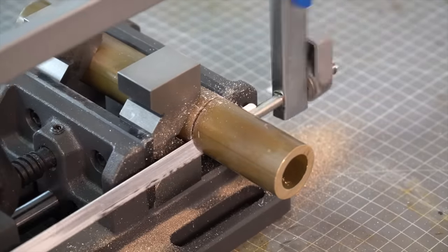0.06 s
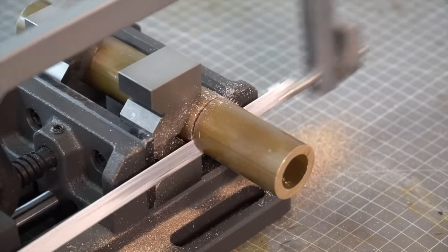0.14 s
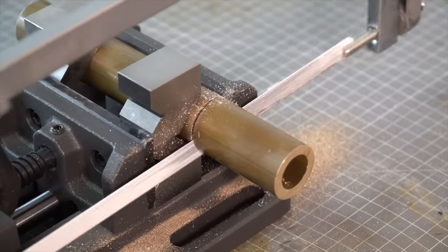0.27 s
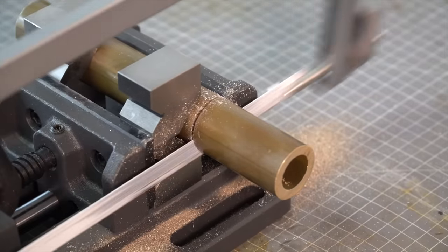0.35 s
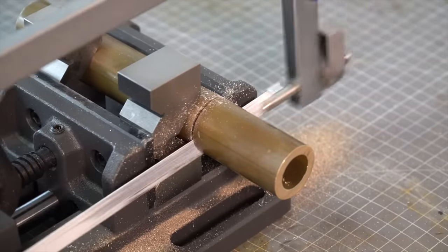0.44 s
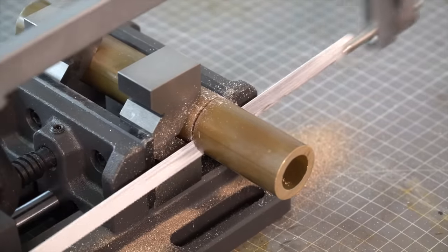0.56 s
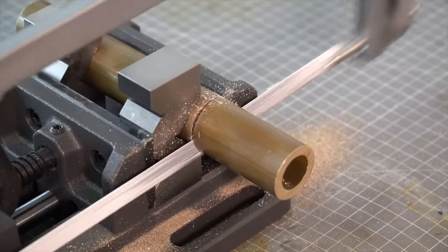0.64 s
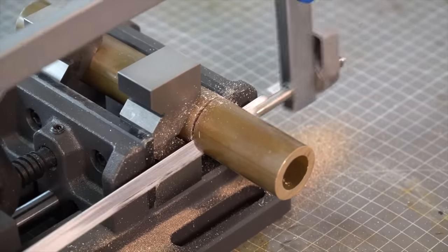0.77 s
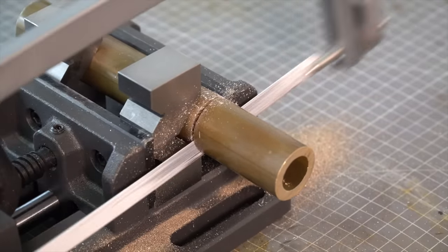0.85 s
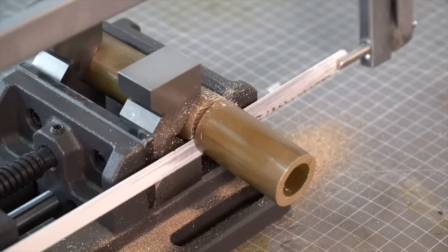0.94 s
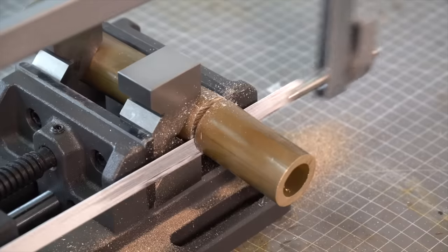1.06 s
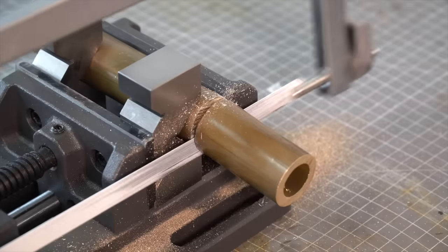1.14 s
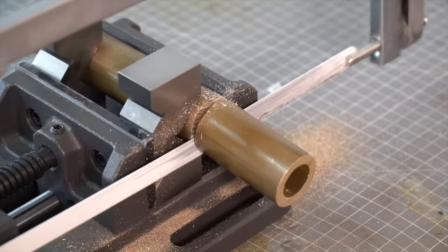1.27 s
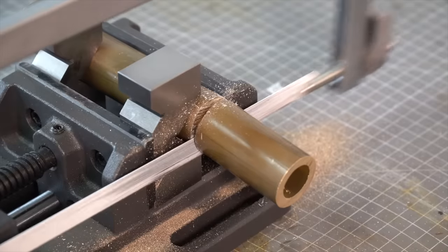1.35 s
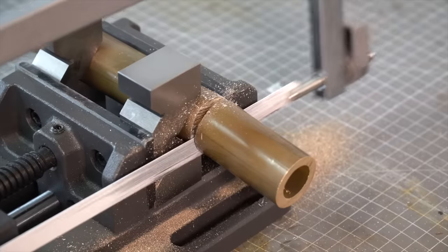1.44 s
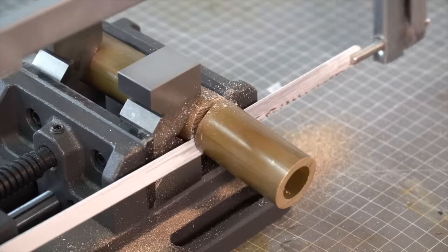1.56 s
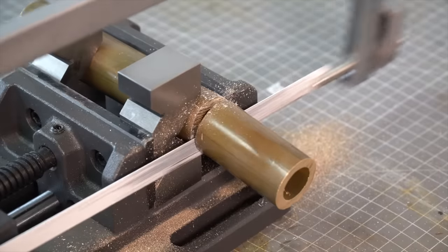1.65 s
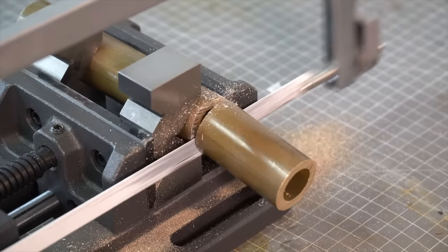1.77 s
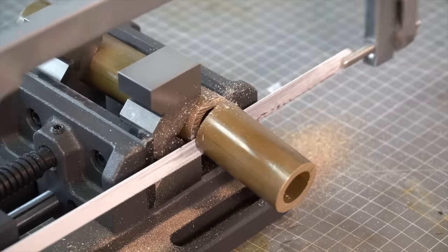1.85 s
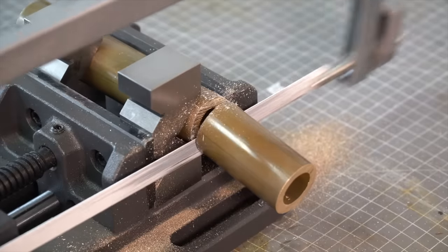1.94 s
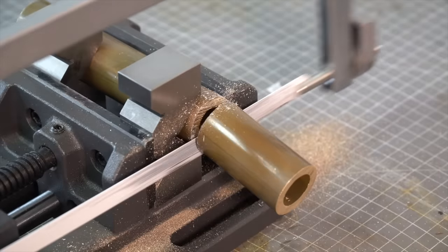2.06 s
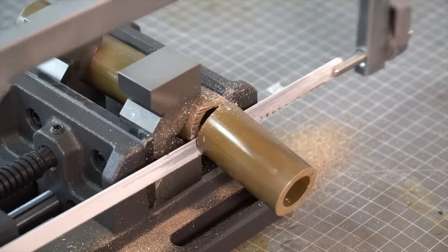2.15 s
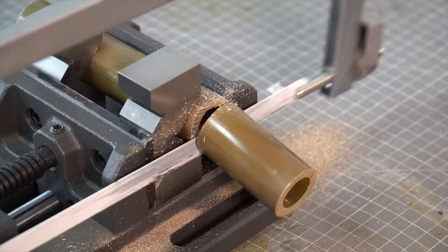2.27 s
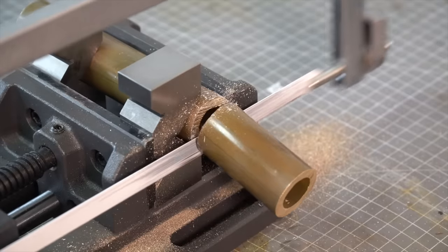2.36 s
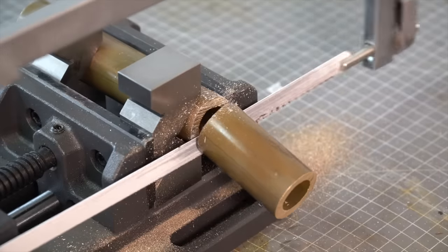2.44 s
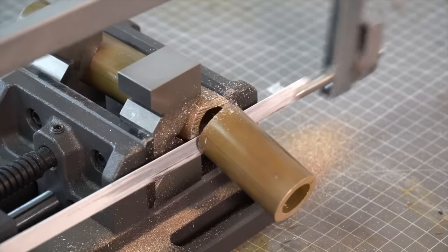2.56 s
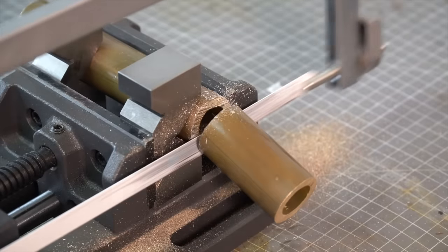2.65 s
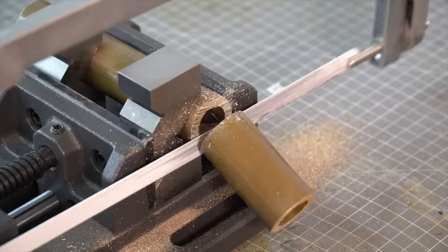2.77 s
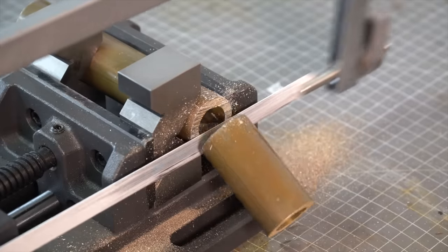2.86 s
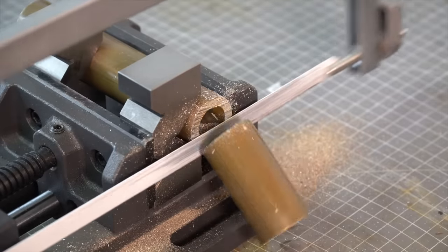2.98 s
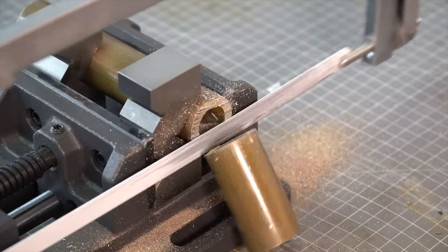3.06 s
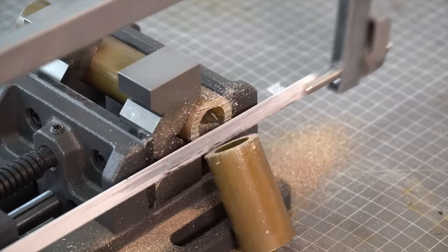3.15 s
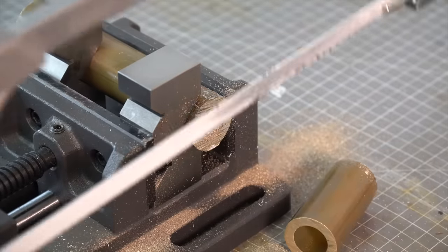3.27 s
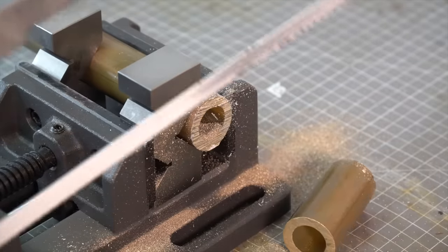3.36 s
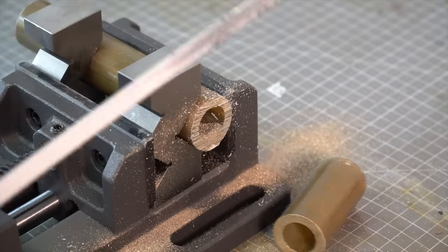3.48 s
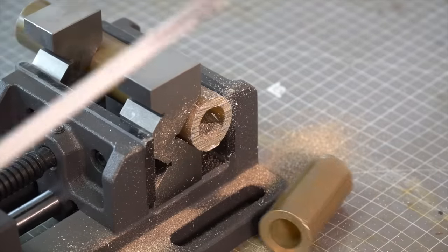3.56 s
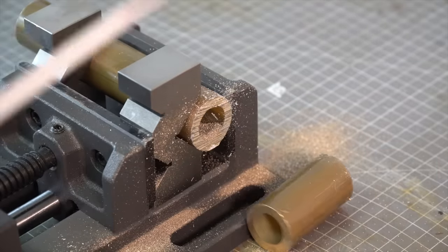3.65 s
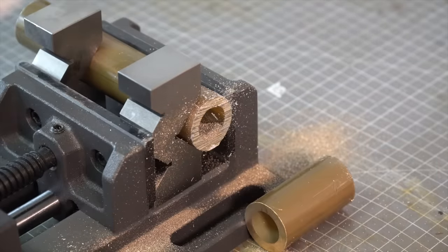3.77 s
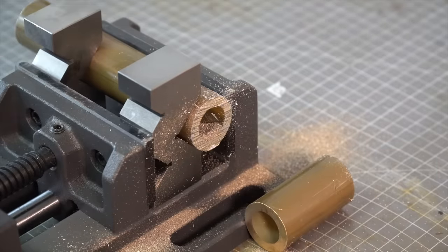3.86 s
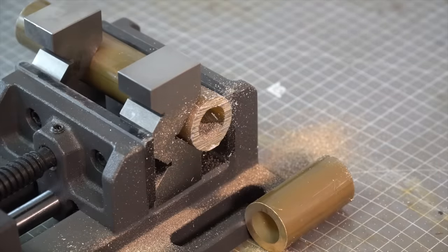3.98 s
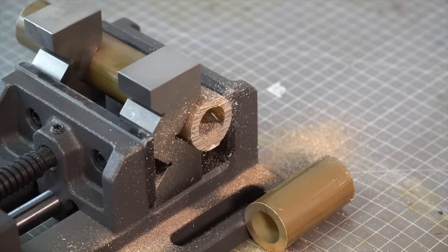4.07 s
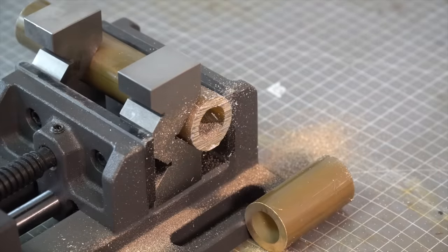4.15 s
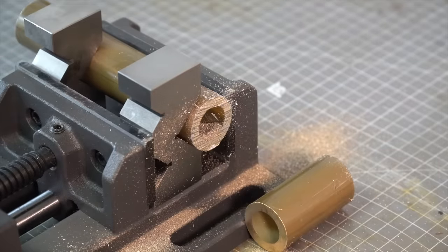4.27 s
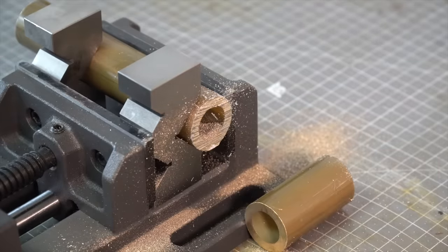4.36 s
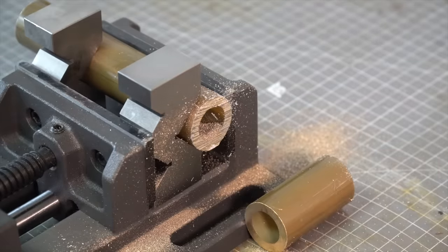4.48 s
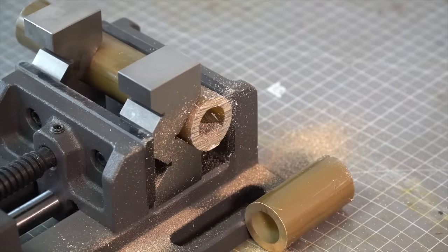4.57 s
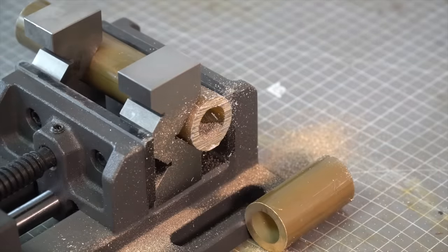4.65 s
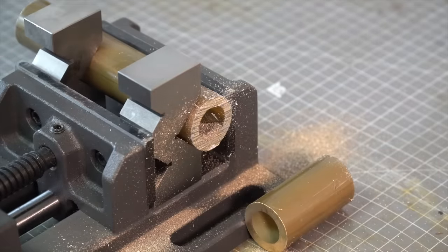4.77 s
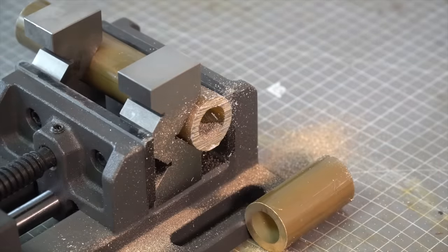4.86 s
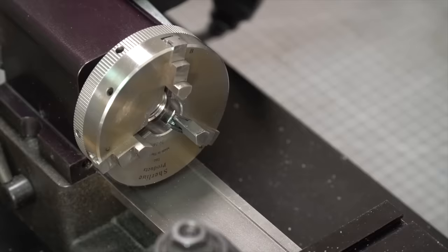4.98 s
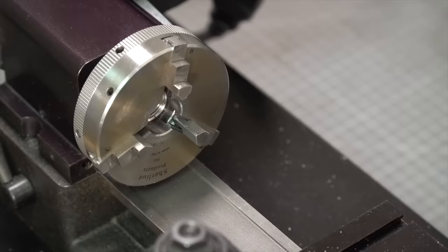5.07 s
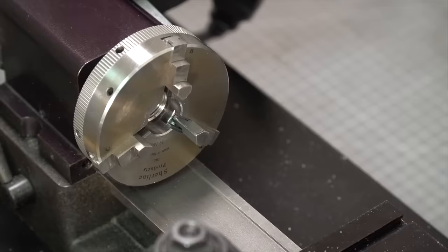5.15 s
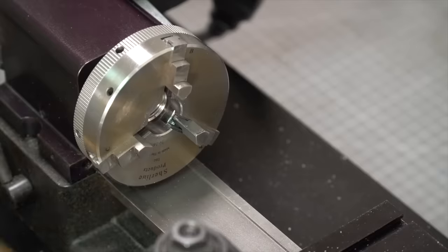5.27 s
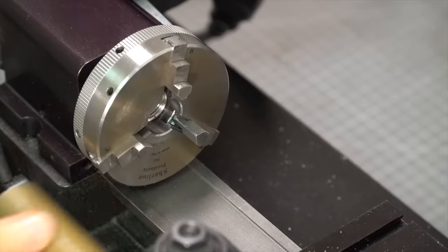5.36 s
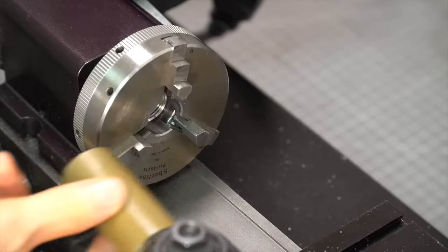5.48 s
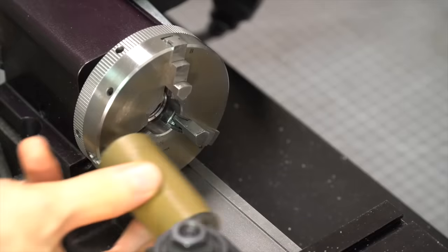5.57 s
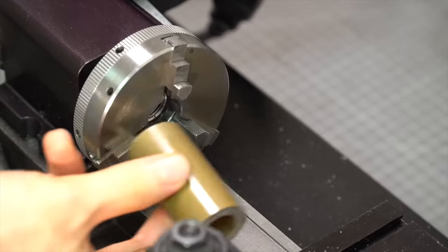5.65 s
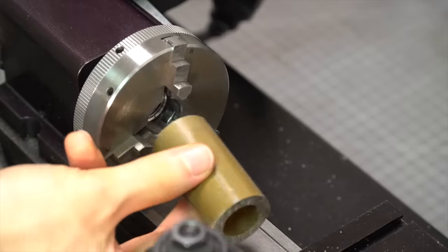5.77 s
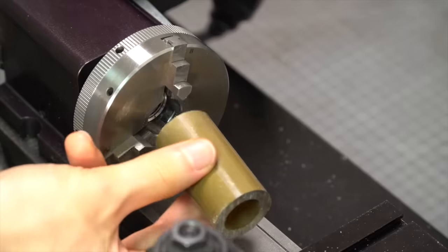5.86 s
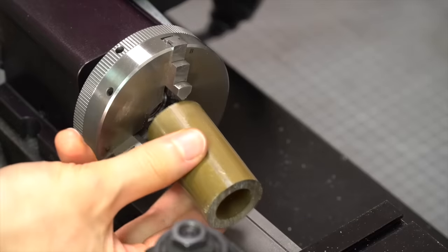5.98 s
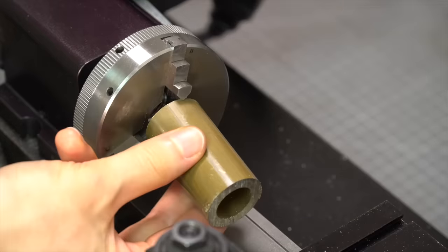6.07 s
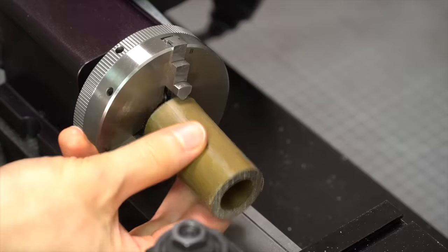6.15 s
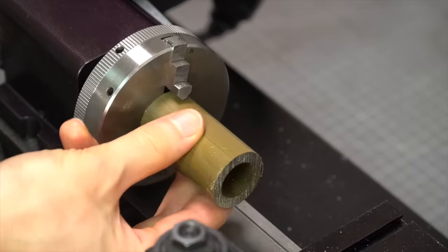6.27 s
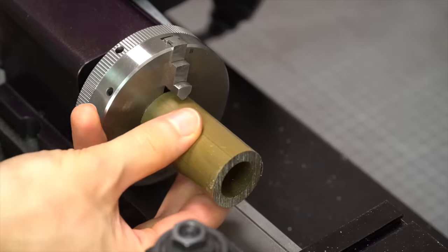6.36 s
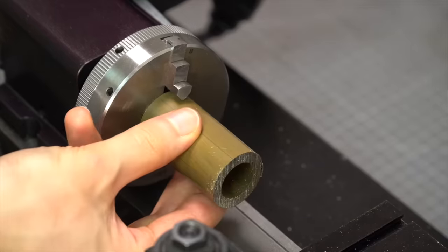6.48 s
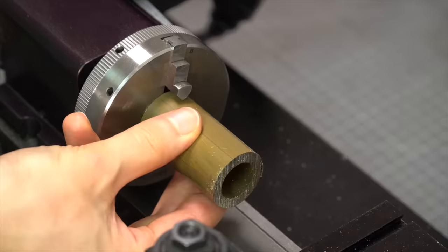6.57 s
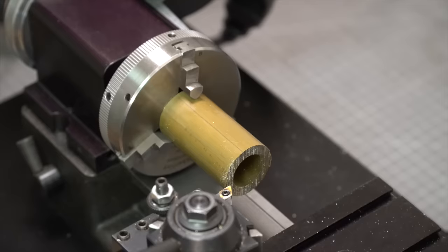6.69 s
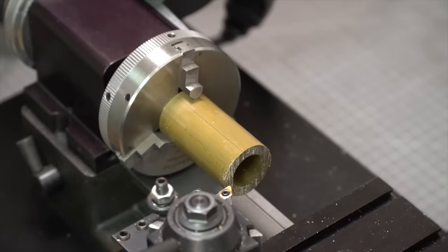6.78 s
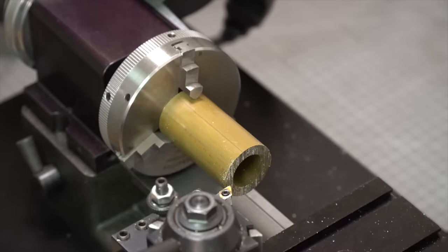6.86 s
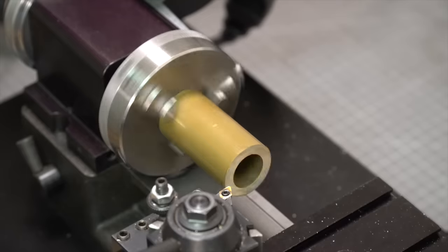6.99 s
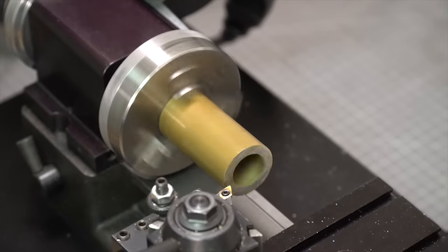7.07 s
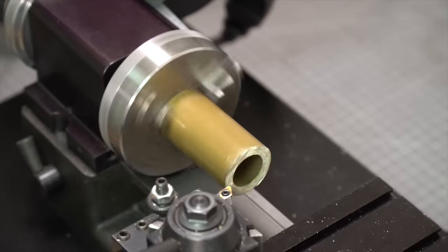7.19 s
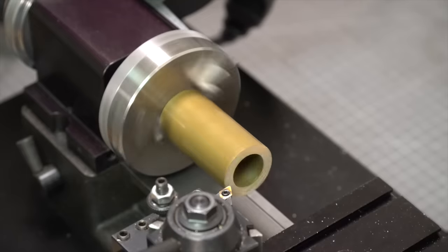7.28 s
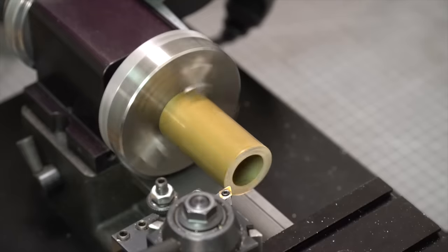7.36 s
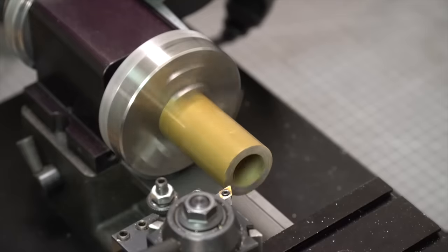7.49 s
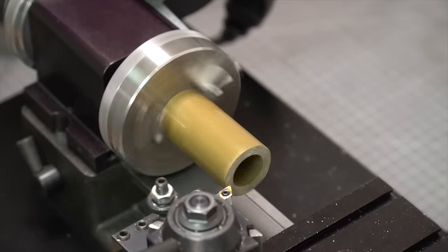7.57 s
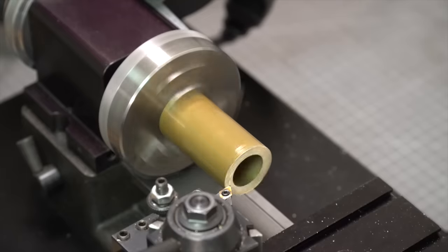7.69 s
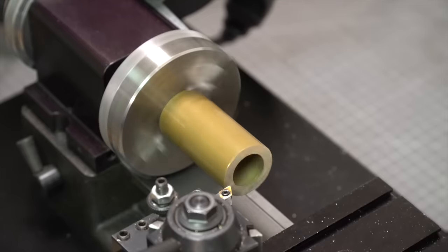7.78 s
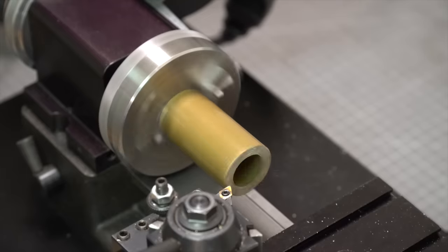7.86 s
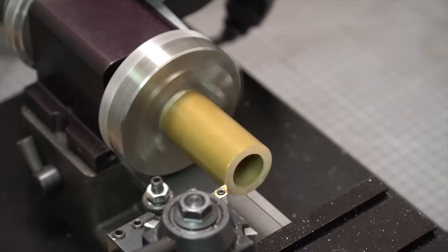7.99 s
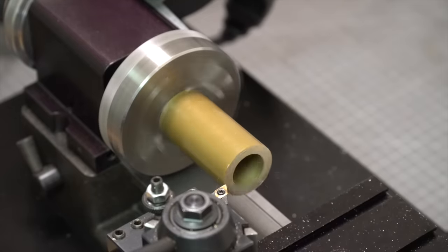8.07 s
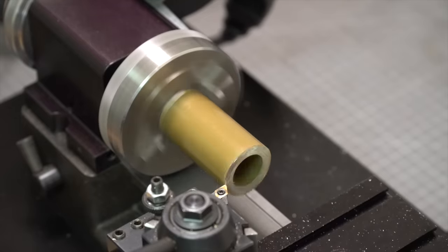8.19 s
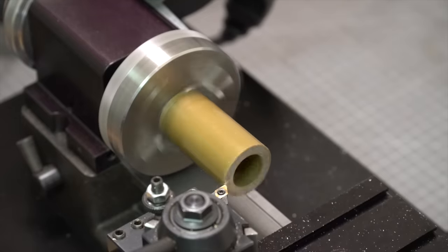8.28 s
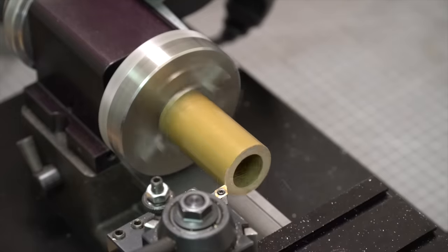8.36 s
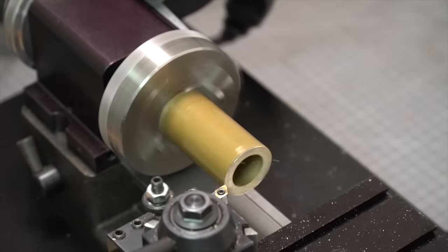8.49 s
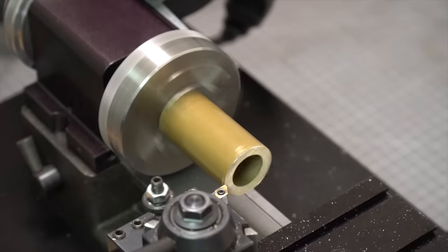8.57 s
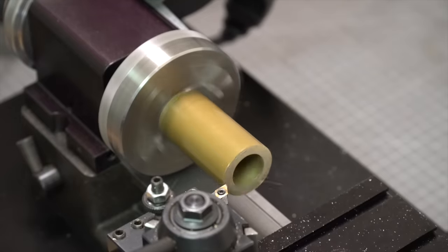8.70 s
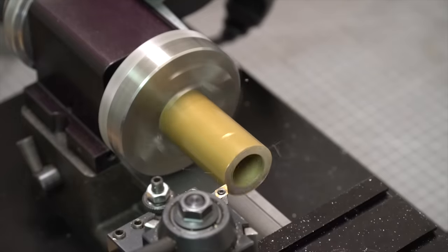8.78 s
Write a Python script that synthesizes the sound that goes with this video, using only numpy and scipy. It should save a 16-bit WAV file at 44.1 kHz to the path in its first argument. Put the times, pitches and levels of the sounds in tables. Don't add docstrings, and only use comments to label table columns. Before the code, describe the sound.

Quick metallic saw strokes stop as a tube piece drops and knocks, quiet handling follows, then a motor hums and a cutting tool scrapes rhythmically.

```python
import sys
import numpy as np
from scipy import signal
from scipy.fft import rfft, irfft
from scipy.io import wavfile
from scipy.ndimage import uniform_filter1d, map_coordinates

SR = 44100
rng = np.random.default_rng(int(sys.argv[2]) if len(sys.argv) > 2 else 0)


def inscribe(sig):
    pcm = np.round(np.clip(np.atleast_2d(sig).T, -1, 1) * 32767)
    wavfile.write(sys.argv[1], SR, pcm.astype(np.int16))


def makeup_ratio(level_db):
    decades = np.asarray(level_db, float) / 20
    return 10 ** decades


N = 389390
T = np.arange(N) / SR

SAW_END_S, TO_CHUCK_S, TO_LATHE_S, MOTOR_ON_S, TO_CUT_S = 3.312, 4.99, 6.731, 6.99, 8.0655

# [blade reverses t/s, fastest at share of stroke, rasp level/dB,
# blade treble relative level/dB, frame ring relative level/dB]
STROKES = [(-.13, 0.41, -29, -7.5, -13.5), (.044, 0.39, -24, -1.5, -12), (0.208, 0.17, -26.5, -1.5, -8.5),
           (.397, 0.66, -31.5, 1.5, -7), (.546, 0.52, -29, 1.5, -5), (.72, 0.52, -25.5, -1.5, -8.5),
           (0.882, 0.34, -29.5, 3.5, -7), (1.087, 0.65, -32, -5, -10), (1.233, 0.57, -34, -2, -5),
           (1.405, 0.45, -34, -2.5, -6.5), (1.544, 0.61, -33.5, -2, -4.5), (1.698, 0.44, -31, -4.5, -5),
           (1.851, 0.57, -30, -2.5, -8), (2.004, 0.35, -29.5, -7.5, -4), (2.15, 0.51, -34.5, -0.5, -8),
           (2.297, 0.26, -35.5, -4, -5), (2.43, 0.47, -36, -5, -4), (2.592, 0.43, -33, -7, -9.5),
           (2.729, 0.48, -33, 1.5, -4.5), (2.89, 0.54, -33, -1.5, -7), (3.015, 0.46, -31, -0.5, -9.5),
           (3.165, 0.49, -32.5, -5.5, -15)]
LAST_STOP_S = 3.336
# [t/s, peak level/dB, squeal f/Hz]
CATCHES = [(0.0727, -10.5, 6530), (0.204, -19, 5700), (0.2342, -4, 5980), (0.343, -14.5, 6924),
           (0.5733, -15.5, 9250), (0.648, -19.5, 6800), (0.7462, -11.5, 7100), (0.7901, -22.5, 6900),
           (0.818, -14, 8650), (0.8994, -14, 5840), (0.949, -15, 9150), (0.9732, -9, 6540),
           (1.3289, -29, 6420), (1.648, -23.5, 5200), (1.711, -20, 6600), (1.7509, -17, 7980),
           (1.867, -18.5, 9080), (1.8927, -19.5, 8300), (1.936, -11.5, 8000), (2.0406, -17, 8240),
           (2.2484, -16, 6330), (2.536, -19.5, 6550), (2.617, -18.5, 8150), (2.743, -20.5, 8260),
           (2.806, -12.5, 8420), (3.041, -20.5, 5900), (3.062, -11.5, 6900), (3.2255, -12, 7800)]
# [t/s, length/s, level/dB, f/Hz]
SQUEALS = [
    (-.01, .06, -33, 6510),
    (.245, .015, -30, 9000),
    (.335, .05, -28, 6700),
    (1.0, .04, -34, 6400),
    (1.33, .07, -40.5, 6650),
    (1.708, .02, -36.5, 6450),
    (1.86, .03, -37, 9000),
    (1.96, .03, -34.5, 7150),
]
# [t/s, level/dB, rise/s, fall/s]
TWANGS = [
    (.203, -1.5, 0.012, 0.011),
    (2.921, -31, 0.0046, 0.032),
]
# [t/s, level/dB]
JAMS = [
    (.56, -35.5),
    (.62, -33.5),
    (.76, -35),
    (.9, -35.5),
]
# [f/Hz, width/Hz, level/dB]
BLADE = [(1610, 9.8, -4.0), (1870, 150, -7.5), (2355, 7.3, 3.5), (2900, 120, -8), (3370, 120, -5.5),
         (3807, 96, -8.0), (4460, 70, -3), (5400, 90, -0.5), (6464, 29, 7.0), (7000, 67, -8.5),
         (8240, 150, -1.5), (9080, 110, -1.5), (10350, 28, -8.5), (10600, 140, -14.0), (10550, 970, -15.5),
         (12100, 340, -6.5), (13100, 120, -5), (13340, 220, -2.5), (14400, 300, -12.5)]
# [f/Hz, level/dB per Hz]
RASP = [(650, -54.5), (1100, -8.5), (1370, -23.5), (1890, -8), (2190, -2.5), (5020, -1), (6500, 5),
        (9770, -3.5), (13800, -10.5), (15600, -34)]
# [f/Hz, width/Hz, level/dB]
VISE = [(88, 35, -0.5), (142.4, 16, -5), (228.9, 4, 3), (412, 44, -10), (726, 200, -8), (45.9, 26, 0.5)]
RASP_DIP_DB, TREBLE_DIP_DB, FRAME_DIP_DB, VISE_DIP_DB = 10, 17.5, 11.5, 7.5
VISE_DB, VISE_SAG_DB_PER_S, VISE_FOLLOWS = -38, 1.5, 0.26
BEND = .008

# [t/s, body level/dB, crack level/dB]
DROP = [
    (3.267, -20, -35),
    (3.365, -60, -63),
    (3.643, -44, -61),
    (3.653, -46, -43),
    (3.7235, -13.5, -23.5),
    (3.816, -32, -48),
    (3.997, -72, -52.5),
]
# [t/s, body level/dB, crack level/dB]
FIT = [
    (6.091, -35, -58),
    (6.104, -28.5, -66),
    (6.114, -29.5, -53),
    (6.309, -37, -78),
    (6.3455, -20.5, -27),
    (6.41, -39, -70),
    (6.515, -30.5, -50),
    (6.53, -56, -64),
]
# [f/Hz, level/dB, t60/s]
BENCH = [(371.5, -1, 0.058), (472, -3.5, 0.23), (569.4, -8, 0.033), (660, -3, 0.032), (887, -2.5, 0.13),
         (980, 0.5, 0.036), (1068, -2, 0.04), (1132, -0.5, 0.061), (1402, -11.5, 0.03836),
         (1706, -8.5, 0.025), (2044, -7, 0.0092), (2363, -7.5, 0.081), (3154, -27, .015)]
# [f/Hz, level/dB, t60/s]
CHUCK = [(523, 4.5, 0.038), (616, 4, 0.034), (700, -3.5, 0.051), (757, -2.5, 0.083), (940, -25, 0.011),
         (1072, -10, 0.11), (1260, -25, 0.015), (1574, -12.5, 0.034), (2480, -29, 0.012), (2740, -27, .02),
         (5200, -19.5, 0.014)]
# [f/Hz, level/dB per Hz]
CLATTER = [(300, -29), (430, 5), (1250, 5), (2500, -25), (5000, -29.5), (12000, -51.5)]
# [f/Hz, level/dB, t60/s]
TUBE = [(14070, 0, .9), (14700, 0, 0.52)]
# [t/s, level/dB]
CHIMES = [
    (3.311, -65.5),
    (3.651, -66),
    (3.722, -52.5),
    (6.09, -72),
    (6.114, -70),
    (6.331, -69),
]
# [t/s, level/dB]
THUDS = [
    (3.27, -41.5),
    (3.652, -46),
    (3.728, -34),
    (6.349, -51),
]
# [f/Hz, level/dB, t60/s]
AFTER = [(305, -19, 5.0), (536.5, -3.5, 0.61), (596, -2.5, 0.49), (754, -15, 0.48), (985, -17.5, 0.59),
         (1196, -18.5, 0.49)]
# [t/s, level/dB, fall/s]
LINGER = [
    (3.313, -65, .12),
    (3.76, -59, 0.62),
]
# [f/Hz, level/dB per Hz]
LINGER_COLOUR = [(200, -9.5), (500, -1), (1300, -4), (2200, -12), (5000, -16.5), (15600, -29.5)]

HUM_HZ, HUM_DB = 119.98, -22
# [multiple, level/dB]
HUM = [(1, -31), (2, -38.5), (3, -17.5), (4, 1), (5, -23.5), (6, -27), (7, -35.5), (8, -68.5), (9, -62),
       (10, -54), (11, -45.5), (12, -45), (13, -54), (14, -70), (15, -56), (16, -57), (17, -54), (18, -48),
       (19, -60), (20, -72), (21, -52), (22, -56), (23, -61), (24, -47), (25, -29.5), (26, -33), (27, -53),
       (28, -41), (29, -48), (30, -44)]
# [f/Hz, level/dB per Hz]
WHIRR_COLOUR = [(40, 15), (110, 6.5), (250, 0.5), (900, -5.5), (2400, -2.5), (4500, -0.5), (8000, 0.5),
                (9300, -3), (10000, -7.5), (15600, -9)]
WHIRR_DB, WHIRR_CUTTING_DB = -61.5, -52.5
# [f/Hz, width/Hz, level/dB]
HOUSING = [(530, 46, -55), (763, 49, -58), (1430, 51, -64), (2900, 83, -61), (4100, 210, -64)]
# [t/s, level/dB]
BELT = [
    (7.11, -56),
    (7.478, -52.5),
    (7.745, -53.5),
    (7.98, -55),
]
TURNS_DB = [-28.5, -32.5, -33.5, -37.5, -30.5, -29, -30.5, -31.5, -29.5, -30.5, -27.5]
FIRST_BITE_S, TURN_S, SLIP_AFTER_S, BOUNCE_AFTER_S = 8.0127, .0781, .0153, .0105
SLIP_DB, FIRST_SLIPS_DB, DEEPEN_S, BOUNCE_DB = -14.5, -5.5, 0.072, -4
SHUDDER_DB_PER_S, SWAY_DB_PER_S, POST_DB_PER_S = 9, 13, 9
# [f/Hz, level/dB, t60/s]
SLIDE = [(353, -7.5, 0.11), (456.4, -8.5, 0.1), (603, -6.5, 0.09), (706, -9, 0.045), (788, -8.5, 0.076),
         (890, -16, 0.057), (1004, -13.5, 0.086), (1135, -4, 0.078), (1260, -7.5, 0.033), (1410, -9, .02),
         (1650, -0.5, 0.019), (1840, -1.5, 0.017)]
# [f/Hz, level/dB, t60/s]
SWAY = [(525, -6.5, .2)]
# [f/Hz, level/dB, t60/s]
INSERT = [(2935, -3, 0.014), (4190, -2.5, 0.0098), (6360, -15.5, 0.0051), (8300, -10, 0.004),
          (11460, -20, 0.027), (14300, -15.5, .06)]

# [f/Hz, t60/s, level/dB]
ROOM = [(330, 0.51, 1), (699, 0.17, 5.5), (1510, 0.24, 0), (3160, 0.27, 10), (7000, 0.32, -5),
        (11940, 0.18, -11.5)]
# [f/Hz, level/dB per Hz]
VISE_AIR = [(41, -38), (70, -1.5), (110, -10.5), (418, -16), (478, -22), (672, -20), (787, -21.5),
            (1010, -22.5), (2500, -31), (15600, -39)]
# [f/Hz, level/dB per Hz]
LATHE_AIR = [(25, 0), (60, 0), (120, -5), (250, -4), (500, -8), (1000, -10), (2000, -17), (4000, -24),
             (8000, -26), (15600, -32)]
VISE_AIR_DB, LATHE_AIR_DB = -62.5, -66
# [from t/s, to t/s, f/Hz, rms level/dB]
TONES = [
    (0, 5.0, 48.4, -64),
    (3.3, 5.0, 15326, -92),
    (5.3, 6.73, 8000, -84),
    (5.3, 6.73, 8059, -89),
    (5.3, 6.73, 8118, -89),
    (5.0, 6.73, 10277, -96),
    (6.7, 8.83, 7.7, -50),
]


def saw():
    speed, rasp_db, treble_db, frame_db = strokes()
    slack = 1 - speed

    def teeth():
        return noise() * makeup_ratio(2.53 * walk(400) + 2 * walk(60))

    broad = level(colour(teeth(), RASP), -4.0)
    drive = teeth()
    modes = 0
    for hz, width, db in BLADE:
        flare_db = (3.8 if hz < 10800 else 2.2) * walk(18)
        modes = modes + makeup_ratio(db + flare_db) * band(drive, hz, width)
    bent_time = np.cumsum(1 + BEND * walk(14))
    blade = broad + map_coordinates(level(modes, -3.0), [bent_time], mode="mirror")
    cut_through = T >= 1.05
    thick = level(band(drive, 1870, 170), -15.5) + level(band(drive, 425, 80), -16.5)
    thin = level(band(drive, 3200, 700), -12)
    blade += np.where(cut_through, thin, thick)
    treble = colour(blade, [(9800, -40), (11400, 1.5)])
    lower = blade - treble
    treble = level(colour(treble, [(14200, -1.5), (15600, -9.5)]), 0)

    frame = band(band(teeth(), 1008.3, 45), 988, 90)
    frame = frame + makeup_ratio(-7.5) * band(drive, 1560, 24) * cut_through
    chatter_db = 1.0 * walk(35)
    sawing = lower * makeup_ratio(-RASP_DIP_DB * slack)
    sawing += treble * makeup_ratio(treble_db - TREBLE_DIP_DB * slack)
    sawing += level(frame, 0) * makeup_ratio(frame_db - FRAME_DIP_DB * slack)
    out = makeup_ratio(rasp_db + chatter_db) * sawing

    vise = sum(makeup_ratio(db + 2 * walk(16)) * band(noise(), hz, width) for hz, width, db in VISE)
    vise_db = VISE_DB - VISE_SAG_DB_PER_S * T - VISE_DIP_DB * slack
    vise_db += VISE_FOLLOWS * (rasp_db - rasp_db.mean())
    bench_shake = bursts([.16], [-26], 0.081, rise_s=0.037)
    out += level(vise, 0) * (makeup_ratio(vise_db) + bench_shake)
    out += level(band(drive, 620, 390), 0) * bursts(*np.transpose(JAMS), 0.077, rise_s=0.022)

    for s, db, hz in CATCHES:
        i = int(s * SR)
        squeal = band(band(noise(count=2000), hz, 1400), hz, 1400)
        out[i:i + 2000] += squeal * makeup_ratio(db + 1.0) * np.exp(-T[:2000] / .011)
    for s, length, db, hz in SQUEALS:
        i, j = max(int(s * SR), 0), int((s + length) * SR)
        swell = np.sqrt(np.abs(np.sin(np.pi * (T[i:j] - s) / length)))
        out[i:j] += level(band(drive[i:j], hz, 150), db) * swell
    twang = np.sin(2 * np.pi * 982 * T) + makeup_ratio(-25.5) * np.sin(2 * np.pi * 1930 * T)
    for s, db, rise, fall in TWANGS:
        out += bursts([s], [db + 3.5], fall, rise_s=rise) * twang
    return out * (T < SAW_END_S)


def strokes():
    s, share, *columns = np.transpose(STROKES)
    fastest = s + np.clip(share, .1, .9) * np.diff(np.append(s, LAST_STOP_S))
    moments = np.append(np.column_stack([s, fastest]), LAST_STOP_S)
    speed = np.abs(np.sin(np.pi / 2 * np.interp(T, moments, np.arange(len(moments)))))
    return speed, *(np.interp(T, fastest, column) for column in columns)


def lathe():
    rise = np.clip((T - MOTOR_ON_S) / 0.049, 0, 1)
    cutting = T > TO_CUT_S
    clock = T + 0.0013 * cutting
    hum = 0
    for multiple, db in HUM:
        phase = multiple * HUM_HZ * clock + rng.random()
        hum = hum + makeup_ratio(db + 0.33 * walk(8)) * np.sin(2 * np.pi * phase)
    whirr = level(colour(noise(), WHIRR_COLOUR), 5.5) * makeup_ratio(0.57 * walk(6.7))
    free = makeup_ratio(WHIRR_DB) + bursts(*np.transpose(BELT), 0.12, rise_s=.015)
    whirr = whirr * np.where(T < TO_CUT_S, free, makeup_ratio(WHIRR_CUTTING_DB))
    housing = sum(level(band(noise(), hz, width), db) for hz, width, db in HOUSING)
    start_buzz = bursts([MOTOR_ON_S], [-46], 0.078, rise_s=0.006)
    housing = housing + level(band(noise(), 3000, 150), 0) * start_buzz
    spindle_hz = np.interp(T, [7.0, 7.6, 8.1], [60, 150, 195])
    spindle = makeup_ratio(-55.5) * np.sin(2 * np.pi * np.cumsum(spindle_hz) / SR) * (T < TO_CUT_S)
    motor = rise * (makeup_ratio(HUM_DB + 2.5) * hum + whirr + housing + spindle)

    bite_db = np.array(TURNS_DB)
    bite_s = FIRST_BITE_S + TURN_S * np.arange(len(bite_db))
    slip_s = bite_s + SLIP_AFTER_S
    slip_db = SLIP_DB + FIRST_SLIPS_DB * np.exp((bite_s[0] - bite_s) / DEEPEN_S)
    bite = burrs(bite_s, bite_db, 0.019, .6) + burrs(bite_s, bite_db - 6.0, 0.0021, 0.32)
    bite = bite * makeup_ratio(5.6 * walk(500))
    slip = burrs(slip_s, slip_db, 0.0076, 0.26)
    slip += makeup_ratio(4.0) * bursts(slip_s, slip_db, 0.00026, rise_s=.00005)
    slip += makeup_ratio(BOUNCE_DB) * burrs(slip_s + BOUNCE_AFTER_S, slip_db, 0.0039, 0.9)
    rub = makeup_ratio(-45.5) * cutting * noise()
    scrape = colour(bite + makeup_ratio(-14.0) * rub,
                    [(800, -26.5), (2000, 2.5), (8000, -0.5), (10000, -8.0), (15500, -17.0)])

    shove = slip + makeup_ratio(-5.0) * bite + rub

    def deeper(db_per_s):
        return shove * makeup_ratio(db_per_s * (T - T[-1]))

    carriage = ring(deeper(SHUDDER_DB_PER_S), SLIDE[:3]) + ring(shove, SLIDE[3:-2])
    carriage += ring(deeper(POST_DB_PER_S), SLIDE[-2:]) + ring(deeper(SWAY_DB_PER_S), SWAY)
    carriage += makeup_ratio(16) * ring(rub * makeup_ratio(5.7 * walk(40)), [(1275, 0, 0.02)])
    tool = makeup_ratio(-27) * carriage + makeup_ratio(-5.0) * scrape
    tool += makeup_ratio(-11.0) * band(band(slip, 3000, 4300), 3000, 4300)
    tip = ring(bite + makeup_ratio(-6.5) * slip + rub, INSERT)
    tool = high(tool + makeup_ratio(-26.5) * tip, 300)
    rumble = makeup_ratio(21.5) * band(rub, 82, 160)
    return motor + rumble + high(room(tool, -12), 320) * cutting


def burrs(times, db, fall_s, fresh):
    t = T[:round(TURN_S * SR)]
    grain = noise(count=len(t)) * np.exp(-t / fall_s)
    again = signal.oaconvolve(bursts(times, db + 8.5, 1 / SR, rise_s=1e-6), grain)[:N]
    return again + fresh * bursts(times, db, fall_s) * noise()


def knocks(events, modes, rattle_s, wet_db, tilt_db, clatter_db, clatter_s):
    s, db, crack_db = np.transpose(events)
    push = bursts(s, db, 1 / SR, rise_s=1e-6) + bursts(s, db - 21.5, rattle_s) * noise()
    unit = sum(makeup_ratio(mode_db) for _, mode_db, _ in modes)
    body = makeup_ratio(10.5) / unit * ring(push, modes)
    grit_colour = [(700, -15.5), (1700, 5.0), (4500, tilt_db), (6500, 2.3 * tilt_db), (15000, 8 * tilt_db)]
    grit = level(colour(noise(), grit_colour), 0)
    crack = bursts(s, crack_db, .003, rise_s=.0001) * grit
    clatter = level(colour(noise() * makeup_ratio(2.5 * walk(150)), CLATTER), clatter_db)
    clatter = clatter * bursts(s, db, clatter_s, rise_s=0.0018)
    echoing = room(high(body + 0.98 * crack, 330), wet_db)
    return echoing + high(clatter, 370) + 0.87 * crack


def tube():
    boom = ring(bursts(*np.transpose(THUDS), 0.0014),
                [(70.65, -34.0, 0.35), (134, -27.5, 0.12), (220, -30.0, 0.38)])
    after = ring(bursts([SAW_END_S], [-62], 0.0067) * noise(), AFTER)
    far = level(colour(noise(), LINGER_COLOUR), 0)
    after += far * sum(bursts([s], [db], fall, rise_s=.002) for s, db, fall in LINGER)
    vise_tap = bursts([3.816], [-52], .0001, rise_s=1e-5)
    ping = ring(vise_tap, [(6240, -5, 0.25), (6420, -3, 0.2)])
    taps = bursts([3.7235, 3.775, 3.816], [-30, -41, -44], .0001, rise_s=1e-5)
    ping += ring(taps, [(2330, -4.0, 0.17), (2420, -4.0, 0.098)])
    chime = ring(bursts(*np.transpose(CHIMES), 1 / SR, rise_s=1e-6), TUBE)
    return boom + after + ping + chime * makeup_ratio(7.5 + 2 * walk(40))


def shop():
    vise_air = level(colour(noise(), VISE_AIR), VISE_AIR_DB)
    lathe_air = level(colour(noise(), LATHE_AIR), LATHE_AIR_DB)
    out = np.where(T < TO_CHUCK_S, vise_air, lathe_air)
    for start, end, hz, db in TONES:
        fade = np.clip(np.minimum(T - start, end - T) / .03, 0, 1)
        out += np.sqrt(2) * makeup_ratio(db + 2 * walk(12.0)) * np.sin(2 * np.pi * hz * T) * fade
    tick = bursts([4.841], [-52], 0.00076) * noise()
    click = bursts([TO_LATHE_S], [-44], 0.016, rise_s=1e-5)
    return out + ring(tick, [(7200, -8, 0.035), (8660, -13, 0.095)]) + click


def room(x, wet_db):
    t = T[:SR // 2]
    tail = 0
    for hz, t60, db in ROOM:
        part = band(noise(count=len(t)), hz, 1.5 * hz) / np.sqrt(hz)
        tail = tail + makeup_ratio(db) * part * 1000 ** (-t / t60)
    tail = tail * (1 - np.exp(-t / 0.0013)) / np.sqrt(np.sum(tail ** 2))
    return x + makeup_ratio(wet_db) * signal.oaconvolve(x, tail)[:N]


def ring(x, modes):
    out = 0
    for hz, db, t60 in modes:
        r = 1000 ** (-1 / (np.clip(t60, .01, 1.5) * SR))
        w = 2 * np.pi * hz / SR
        out = out + makeup_ratio(db) * signal.lfilter([0, r * np.sin(w)], [1, -2 * r * np.cos(w), r * r], x)
    return out


def bursts(times, db, fall_s, rise_s=.0003):
    out = np.zeros(N)
    for s, gain in zip(times, makeup_ratio(np.asarray(db))):
        i = int(s * SR)
        t = T[:min(int(8 * fall_s * SR), N - i)]
        out[i:i + len(t)] += gain * (1 - np.exp(-t / rise_s)) * np.exp(-t / fall_s)
    return out


def band(x, hz, width):
    return signal.lfilter(*signal.iirpeak(min(hz, .45 * SR), hz / width, fs=SR), x)


def colour(x, points):
    hz, db = np.transpose(points)
    f = np.maximum(np.fft.rfftfreq(len(x), 1 / SR), 1)
    return irfft(rfft(x) * makeup_ratio(np.interp(np.log(f), np.log(hz), db)), len(x))


def high(x, hz):
    return signal.sosfilt(signal.butter(4, hz, "high", fs=SR, output="sos"), x)


def level(x, db):
    return x * makeup_ratio(db) / np.sqrt(np.mean(x ** 2))


def walk(rate):
    k = int(SR / rate)
    steps = np.repeat(rng.standard_normal(N // k + 1), k)
    return 1.1 * uniform_filter1d(steps, k)[:N]


def noise(count=N):
    return rng.standard_normal(count)


def scene():
    fall = knocks(DROP[:1], BENCH, 0.0061, -0.55, 1.5, -3.5, 0.026)
    fall = fall * np.where(T < SAW_END_S, 1, makeup_ratio(-18.0))
    bench = fall + knocks(DROP[1:], BENCH, 0.0038, -3.5, -8.0, -7.0, 0.049)
    chuck = high(knocks(FIT, CHUCK, 0.0042, -4.5, -11.5, -14.5, 0.039), 380)
    return (saw() + bench + chuck + tube() + lathe() + shop())[None]


def band_limit(x):
    return signal.sosfilt(signal.butter(12, 15720, fs=SR, output="sos"), x)


def record(dry):
    mix = signal.sosfilt(signal.ellip(8, .2, 60, 15650, fs=SR, output="sos"), dry)
    return band_limit(mix)


dry = scene()
out = record(dry)
inscribe(out)
```